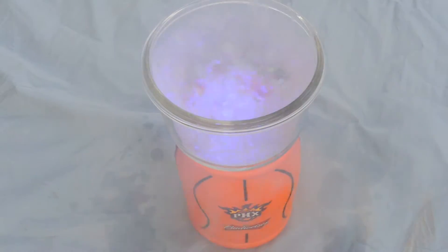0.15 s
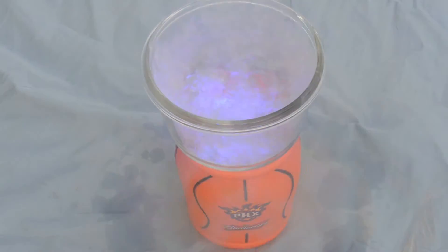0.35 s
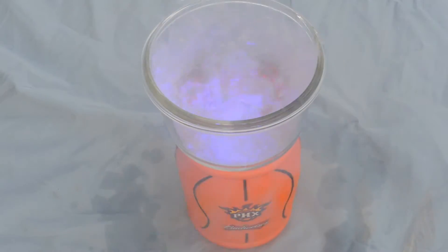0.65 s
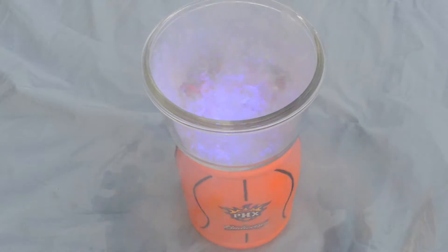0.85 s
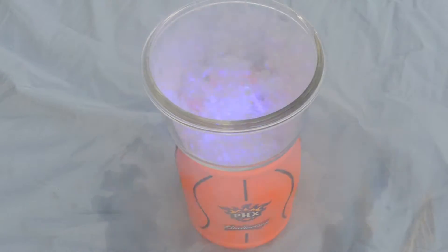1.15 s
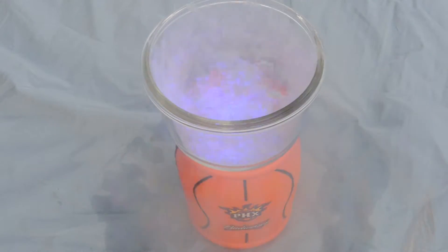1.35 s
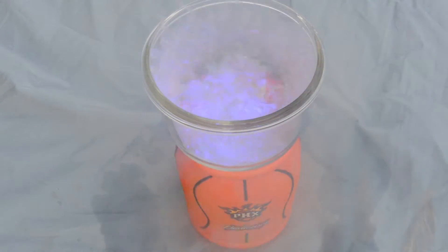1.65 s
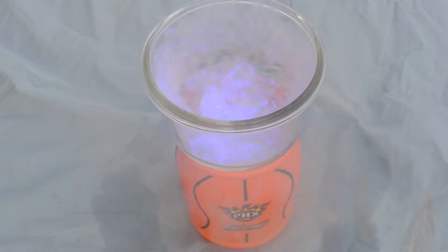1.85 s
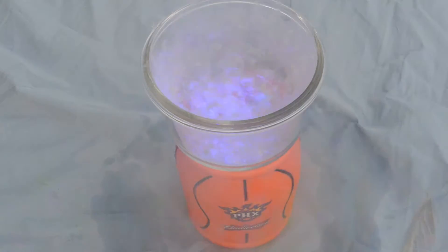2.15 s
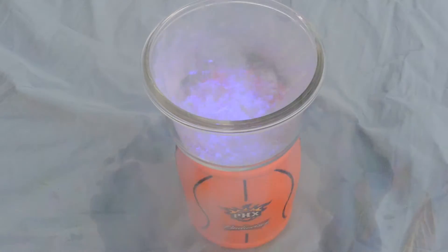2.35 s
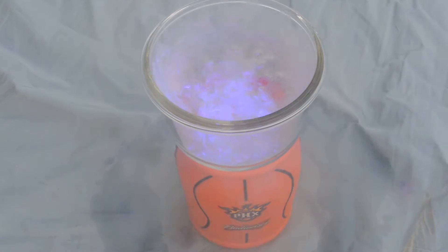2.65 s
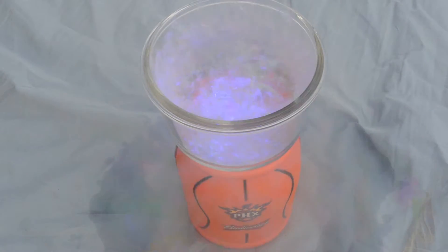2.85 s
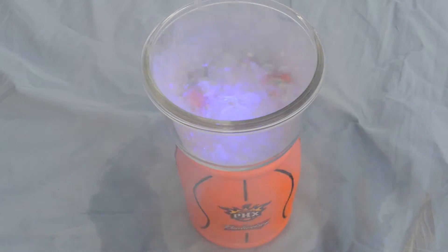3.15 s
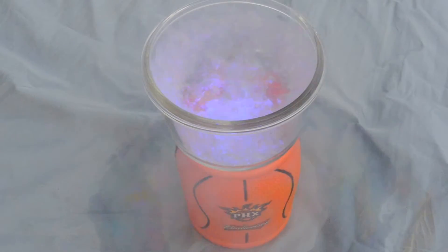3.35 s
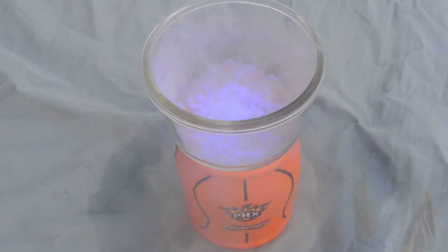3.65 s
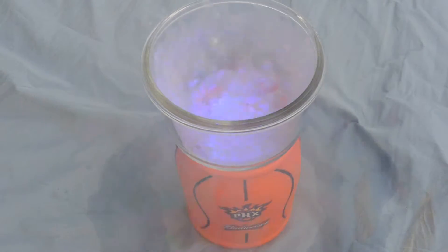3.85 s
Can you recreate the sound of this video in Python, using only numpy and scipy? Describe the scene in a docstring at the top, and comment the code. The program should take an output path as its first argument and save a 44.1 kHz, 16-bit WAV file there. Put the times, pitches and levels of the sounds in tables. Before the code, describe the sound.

Quiet simmer of a fizzing, boiling liquid, broken by sharp knocks of containers set down nearby

```python
"""A soft hiss and tiny bubble pops run throughout, as cold liquid simmers, with a faint hum behind. Beside it a
metal flask is set down and nudged, and a second vessel, a small lid and a glass are knocked. Dull taps and
short scrapes sound on the table, all in a small room. Knocked objects are sums of fading sine tones plus a
crack of noise; taps and pops are very short sines. Hiss, hum, scrapes and the room's echo are random noise
passed through filters."""
import sys
import numpy as np
from scipy import signal
from scipy.io import wavfile
from scipy.ndimage import uniform_filter1d

SR = 44100
rng = np.random.default_rng(int(sys.argv[2]) if len(sys.argv) > 2 else 0)


def output_pcm(signal):
    """Save a mono or channel-first signal as 16-bit PCM at the path in sys.argv[1].

    Samples are clipped to [-1, 1] before scaling.
    """
    pcm = np.clip(np.atleast_2d(signal).T, -1, 1) * 32767
    wavfile.write(sys.argv[1], SR, np.round(pcm).astype(np.int16))


N = 176400  # 4 seconds of samples

# The tones each object rings with, before a blow colours and damps them:
# pitch_hz, level_db (relative), fade_s (time to fall 60 dB)
FLASK_TONES = [(77.8, -19.5, 0.29), (164.5, -18, 0.74), (227, -16, 0.25), (456.5, 4.5, 0.21),
               (540, -0.5, 0.048), (716, -16, 0.31), (802, -28, 3), (920, -7, 0.061), (1214, -8, 0.077),
               (1217, -16.5, 0.28), (1701, -19.5, 0.32), (2191, -20, 0.2), (2428, -22, 0.23),
               (2820, -30, 0.36), (2950, -29, 0.16), (4800, -50, 0.25), (6000, -46, 0.12),
               (7470, -43.5, 0.081), (8800, -51.5, 0.11), (10700, -49.5, .12), (12600, -49.5, 0.13)]
VESSEL_TONES = [(139.5, -29, 0.31), (430, -10, 0.011), (568, 4, 0.047), (662.6, -7, 0.36),
                (814, 8.5, 0.027), (1138, 10.5, 0.069), (1212, -0.5, 0.26), (1300, -9, 0.75),
                (1470, -18, 0.17), (1476, -18, 0.16), (1650, -4.5, 0.098), (1960, -12.5, 0.6),
                (2000, -47, 0.59), (2160, -22.5, 0.18), (2570, -19.5, 0.13), (3000, -45, 0.18),
                (3130, -50, 0.19), (5744, -71, 0.139), (8850, -65.5, 0.14), (11200, -54, 0.046)]
LID_TONES = [(1097, 13, 0.12), (1097, -12, 0.27), (1710, -13, .23)]
GLASS_TONES = [(532.3, -8, 0.17), (677, 6, 0.036), (820, -11, 0.098), (1105, -4.5, 0.11), (1351, 4, 0.065),
               (1585, -6, .12), (1767, -19, 0.11), (2499, -13, 0.12), (2564, -23, 1), (3010, -16.5, 0.36),
               (3180, -23, 0.083), (4130, -41, 0.24), (5120, -26, 0.14), (6060, -35, 0.17),
               (7400, -25, 0.04)]
# Blows on each object: start_s, ring_peak_db, bass_db_per_octave (below 1 kHz),
# treble_db_per_octave (above 1 kHz), damping_db_per_s, crack_peak_db, crack_hz,
# crack_fade_s (60 dB fall, before the crack is filtered)
FLASK_HITS = [(.0765, -0.5, 0, 2.5, 17.5, -27, 2490, 0.041), (.128, -31, -9, -3, 60, -44, 298, 0.052),
              (.149, -31.5, -13, 5, 62, -39.5, 5800, 0.11), (.163, -20, 7.5, 2, 60, -28, 243, 0.11),
              (.184, -29, 7.5, -4, 98, -49, 250, 0.03), (.5255, -28, -7, 5.5, 296, -48, 3000, 0.14),
              (.752, -26.5, -16.5, 4.5, 209, -33.5, 1490, 0.06),
              (.761, -23, -22, -8, 214, -39, 2640, 0.095)]
VESSEL_HITS = [(1.370, -30, 12, -40, 400, -27, 590, 0.064), (1.388, -25.5, 11.5, -8, 200, -28, 890, .03),
               (1.397, -28.5, 9.5, 14, 100, -53, 1510, 0.095),
               (1.417, -29.5, 10.5, -22, 202, -52, 705, 0.037), (1.449, -59, 0, -1, 200, -59, 2500, 0.021),
               (1.5275, -6.5, -3.5, 5.5, 60, -19, 1020, 0.012), (1.576, -54, -12, -5, 60, -52, 1200, .03),
               (1.782, -17.5, 10, 6.5, 297, -28, 863, 0.061)]
LID_HITS = [(0.314, -31, 0, 36, 50, -55.5, 1300, 0.06), (.340, -19.5, -10, -6, 20, -66, 1100, .03),
            (.608, -37.5, 1, 9, 83, -42, 1280, .03), (0.637, -39, 0, 2, 50, -54, 1080, 0.025)]
GLASS_HITS = [(1.831, -8.5, 0, 0, 20, -9, 2100, 0.087)]
# Dull taps on the table: start_s, peak_db, pitch_hz, length_cycles
TABLE_TAPS = [(.565, -29.5, 342, 1.6), (.674, -35.5, 475, 6.8), (.712, -29.5, 360, 0.73),
              (2.189, -23, 860, 0.43), (2.228, -34.5, 598, 7.7), (2.236, -25.5, 930, 0.53),
              (2.250, -47, 590, 1.7), (2.268, -26, 745, 1.8), (2.310, -41.5, 600, 2.8),
              (2.579, -39.5, 243, 3.7), (2.582, -37.5, 111, 1.8)]
# Things rocking or dragged on the table:
# start_s, length_s, rms_db (before swell and wobble), pitch_hz, width_hz (of each filter)
TABLE_SCRAPES = [(0.082, 0.11, -29.5, 74.3, 25), (0.117, 0.034, -33, 215, 354),
                 (0.29, 0.079, -49.5, 1100, 500), (1.378, 0.028, -47, 850, 1340),
                 (1.532, 0.048, -53, 1610, 1870), (0.575, 0.11, -61.5, 1300, 1450),
                 (1.40, 0.05, -55, 2800, 302), (1.654, 0.12, -56, 2600, 2340),
                 (1.641, 0.097, -66.5, 8900, 5900), (1.666, 0.076, -49.5, 110, 79),
                 (2.194, 0.16, -58, 910, 1670)]
# Bubble pops placed by hand: start_s, peak_db (of the lower of two tones)
LOUD_POPS = [(0.9378, -50), (1.1253, -37), (1.3248, -40), (1.353, -55), (2.9741, -37.5), (3.0414, -35.5),
             (3.0585, -37), (3.1139, -32.5), (3.1802, -37.5), (3.2183, -34.5), (3.6279, -35.5)]
# Tone colour of the hiss: pitch_hz, level_db (per Hz, relative)
HISS_COLOUR = [(30, 4), (60, -9), (120, 0), (250, -8), (500, -3.5), (1200, 1.5), (2000, -3.5), (2500, -14),
               (3100, -10.5), (4000, -23), (6500, -31), (11000, -29.5), (16000, -40.5)]
# Overall loudness of the hiss over time: time_s, rms_db
HISS_LEVEL = [(0, -47.5), (.9, -50), (4, -51.5)]
# Humming tones: pitch_hz, rms_db, width_hz
HUM_TONES = [(117, -70.5, 15), (343.8, -66, 6.8)]
# How long the room's echo lasts: pitch_hz, fade_s (60 dB fall)
ROOM_FADE = [(200, 0.37), (1000, 0.36), (4000, .3), (12000, 0.22)]

RISE_S = 0.00053  # time constant of a ring's start
CRACK_WIDTH = 0.98  # width of each crack filter, as a share of its centre
SPOT_DB = 1.4  # random spread of each tone's level from blow to blow
# Close partials around each tone: level at 1 kHz, pitch spread as a share, rise per octave
NEIGHBOUR_DB, NEIGHBOUR_SPREAD, NEIGHBOUR_TILT_DB = -20, .05, 8
POPS_PER_S, POP_DB, POP_SCATTER_DB = 220, -66, 4.2
POP_HZ, POP_OCTAVES, POP_CYCLES = 3200, 1.15, 1.6  # middle pitch, pitch spread, length
POP_TILT_DB = -1.5  # per octave of bubble pitch above 1500 Hz
SWELL_DB, FLICKER_DB = .6, 1.1  # shared slow swell, separate flicker of each hiss band
SPUTTER_DB, SPUTTER_PER_S = 2.5, 150  # shared quick flutter, full strength from 3 kHz up
ROOM_DB, ROOM_GAP_S = -8, .003  # echo strength, time constant of its start
MIC_LOW_HZ, TOP_HZ = 60, 16300


def undb(db):
    """Turn decibels into a plain multiplier."""
    return 10 ** (np.asarray(db) / 20)


def band(x, hz, width):
    """Keep the sound near one pitch with a resonant filter, gain 1 at the centre."""
    return signal.lfilter(*signal.iirpeak(min(hz, .45 * SR), hz / width, fs=SR), x)


def narrow_band(x, hz, width):
    """Filter twice, so sound away from the centre drops faster."""
    return band(band(x, hz, width), hz, width)


def unit(x):
    """Scale to an rms level of 1."""
    return x / np.sqrt(np.mean(x ** 2))


def curve(hz, table):
    """Read a table at any pitch, evenly by octave between its rows."""
    pitches, values = np.array(table).T
    return np.interp(np.log(hz), np.log(pitches), values)


def add(out, start_s, x, peak_db):
    """Mix x into out at a start time, with the given peak level."""
    i = int(start_s * SR)
    x = x[:N - i]
    out[i:i + len(x)] += x * undb(peak_db) / np.max(np.abs(x))


def walk(rate):
    """Random levels, rate per second, smoothed twice into a wandering line with spread near 1."""
    hold = int(SR / rate)
    steps = np.repeat(rng.standard_normal(N // hold + 1), hold)
    return 1.3 * uniform_filter1d(uniform_filter1d(steps, hold), hold)[:N]


def grain(hz, cycles):
    """A sine that dies away within a few cycles."""
    turns = np.arange(int(6 * cycles * SR / hz) + 4) * hz / SR
    return np.sin(2 * np.pi * turns) * np.exp(-turns / cycles * 2)


def struck(tones, blows):
    """Each blow rings the object's tones and their close neighbours, with a crack of noise."""
    out, t = np.zeros(N), np.arange(SR // 2) / SR
    hz, level_db, fade_s = np.array(tones).T[:, :, None]

    def sine(f):
        return np.sin(2 * np.pi * f * t)

    neighbours = 0
    for _ in range(8):
        detune = 1 + NEIGHBOUR_SPREAD * rng.standard_normal(hz.shape)
        neighbours = neighbours + sine(hz * detune)
    octave = np.log2(hz[:, 0] / 1000)  # distance from 1 kHz
    neighbour_db = np.minimum(NEIGHBOUR_DB + NEIGHBOUR_TILT_DB * octave, 0)
    mixed = sine(hz) + undb(neighbour_db)[:, None] * neighbours
    partials = undb(-60 * t / fade_s) * mixed

    for start_s, ring_db, bass_db, treble_db, damp_db, crack_db, crack_hz, crack_fade_s in blows:
        colour_db = np.where(octave > 0, treble_db, -bass_db) * octave
        colour_db = colour_db + SPOT_DB * rng.standard_normal(len(hz))
        ring = undb(level_db[:, 0] + colour_db) @ partials
        ring = ring * undb(-damp_db * t) * (1 - np.exp(-t / RISE_S))
        add(out, start_s, ring, ring_db)
        noise = rng.standard_normal(len(t)) * undb(-60 * t / crack_fade_s)
        add(out, start_s, narrow_band(noise, crack_hz, CRACK_WIDTH * crack_hz), crack_db)
    return out


def taps():
    """Dull knocks on the table: short dying sines, softened by a wide filter."""
    out = np.zeros(N)
    for start_s, peak_db, hz, cycles in TABLE_TAPS:
        add(out, start_s, band(grain(hz, cycles), hz, 2 * hz), peak_db)
    return out


def scrapes():
    """Uneven friction noise that swells and fades."""
    out, t = np.zeros(N), np.arange(N) / SR
    for start_s, length_s, rms_db, hz, width in TABLE_SCRAPES:
        swell = np.sin(np.pi * np.clip((t - start_s) / length_s, 0, 1))
        wobble_db = 3.5 * walk(150)
        noise = unit(narrow_band(rng.standard_normal(N), hz, width))
        out += swell * undb(rms_db + wobble_db) * noise
    return out


def bubbles():
    """Gas bubbles burst at random as short clicks, higher ones fainter on average; louder pops are added."""
    out = np.zeros(N)
    for _ in range(int(POPS_PER_S * N / SR)):
        when, size, pitch = rng.random(), rng.exponential(), rng.standard_normal()
        hz = np.clip(POP_HZ * 2 ** (POP_OCTAVES * pitch), 700, 14000)
        tilt_db = POP_TILT_DB * np.log2(max(hz, 1500) / 1500)
        peak_db = POP_DB + POP_SCATTER_DB * min(size, 3.5) + tilt_db
        add(out, when * (N - 9) / SR, grain(hz, POP_CYCLES), peak_db)
    for start_s, peak_db in LOUD_POPS:
        add(out, start_s, grain(1500, 1.8), peak_db)
        add(out, start_s, grain(6000, 1.3), peak_db - 12)
    return out


def hiss():
    """Simmering hiss: third-octave noise bands swell together, flicker alone and share a quick flutter."""
    out, swell, sputter = 0, walk(5.04), walk(SPUTTER_PER_S)
    for hz in 30 * 2 ** np.arange(0, 9.2, 1 / 3):
        noise = unit(narrow_band(rng.standard_normal(N), hz, hz / 3))
        motion_db = SWELL_DB * swell + FLICKER_DB * walk(12)
        motion_db = motion_db + SPUTTER_DB * min(hz / 3000, 1) * sputter
        # wider bands hold more energy, hence the square root
        out = out + noise * np.sqrt(hz) * undb(curve(hz, HISS_COLOUR) + motion_db)
    time_s, rms_db = np.array(HISS_LEVEL).T
    return unit(out) * undb(np.interp(np.arange(N) / SR, time_s, rms_db))


def hum():
    """Two faint wavering tones, made of narrowly filtered noise."""
    out = np.zeros(N)
    for hz, rms_db, width in HUM_TONES:
        out += undb(rms_db) * unit(band(rng.standard_normal(N), hz, width))
    return out


def room(x):
    """Diffuse echo: noise whose bands decay at their own rates."""
    t = np.arange(SR // 2) / SR
    tail = np.zeros(len(t))
    for hz in 80 * 2 ** np.arange(0, 8, .5):
        noise = band(rng.standard_normal(len(t)), hz, hz / 2)
        tail += noise * undb(-60 * t / curve(hz, ROOM_FADE))
    tail = tail * (1 - np.exp(-t / ROOM_GAP_S))
    tail = tail / np.sqrt(np.sum(tail ** 2))  # total energy 1
    return signal.fftconvolve(x, tail)[:N] * undb(ROOM_DB)


def scene():
    """Objects, table and bubbles get the room's echo; hiss and hum are added without it."""
    near = struck(FLASK_TONES, FLASK_HITS) + struck(VESSEL_TONES, VESSEL_HITS)
    near += struck(LID_TONES, LID_HITS) + struck(GLASS_TONES, GLASS_HITS)
    near += taps() + scrapes() + bubbles()
    return (near + room(near) + hiss() + hum())[None]


def record(dry):
    """The microphone loses the deepest bass; the recorder cuts the top."""
    bass_cut = signal.butter(3, MIC_LOW_HZ, "high", fs=SR, output="sos")
    top_cut = signal.ellip(10, .2, 70, TOP_HZ, fs=SR, output="sos")
    return signal.sosfilt(top_cut, signal.sosfilt(bass_cut, dry))


dry = scene()
out = record(dry)
output_pcm(out)
```